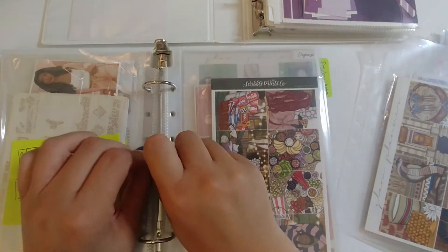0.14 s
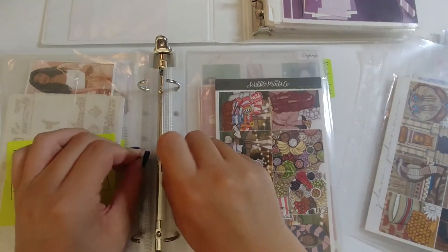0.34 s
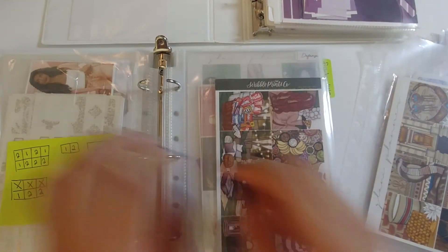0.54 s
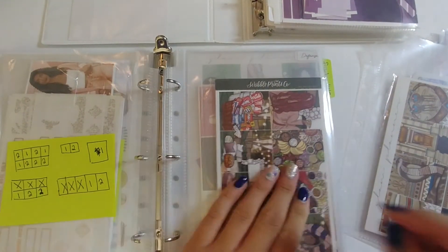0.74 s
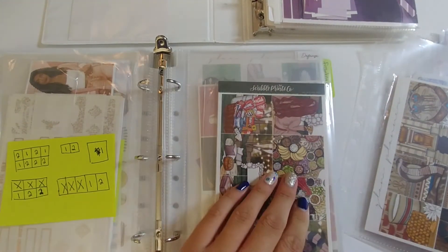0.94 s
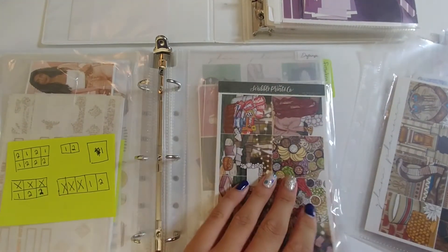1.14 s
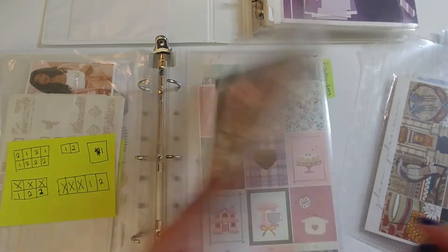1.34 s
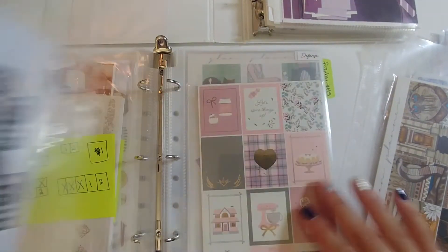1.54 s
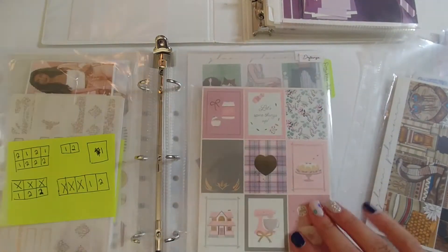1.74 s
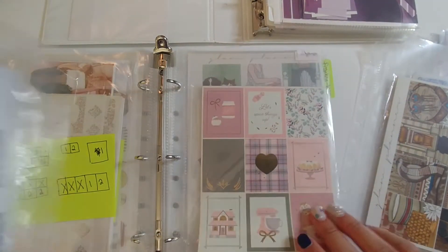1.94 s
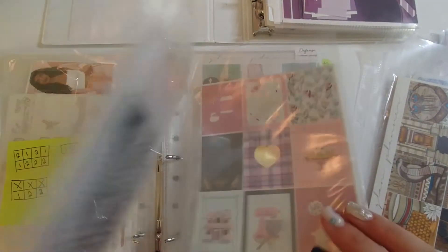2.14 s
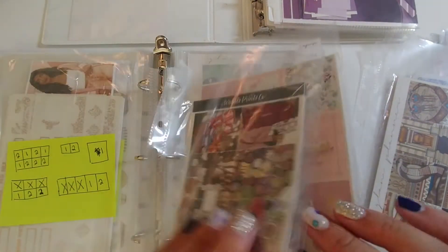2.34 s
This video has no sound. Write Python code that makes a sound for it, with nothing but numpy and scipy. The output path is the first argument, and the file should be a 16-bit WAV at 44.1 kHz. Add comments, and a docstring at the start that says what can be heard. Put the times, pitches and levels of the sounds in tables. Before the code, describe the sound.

Stiff plastic sleeves crackle and rustle under turning hands. First, a small scuff at 0 s, then a binder's steel ring snaps shut at 0.2 s with a tiny high ring, double clack, clatter and low thump. Near quiet follows. Crisp pops and swishes burst from 1.2 to 1.5 s, then again from about 1.95 to 2.45 s, with soft thumps. Close, small room, low hum.

```python
"""A small room with a low hum: a ring binder snaps shut on a table, then hands turn stiff plastic sleeves.
The steel ring sings on two sine tones, clacks in decaying noise and clatters in random ticks.
Board modes thump as damped sines; knocks and scuffs are decaying noise bands.
Creases pop as volleys of noise with ringing bands; the sleeves rustle in random clicks over hiss.
Hum lines waver over shaped noise, and sparse echoes make the room."""
import sys
import numpy as np
from scipy import signal
from scipy.io import wavfile
from scipy.ndimage import uniform_filter1d

SR = 44100
rng = np.random.default_rng(int(sys.argv[2]) if len(sys.argv) > 2 else 0)


def to_wav(sig):
    """Store sig (one row per channel, or 1-D mono) as 16-bit WAV at the path in sys.argv[1].

    Samples outside -1..1 are clipped; the rate is SR.
    """
    pcm = np.clip(np.atleast_2d(sig), -1, 1) * 32767
    pcm = np.round(pcm).astype(np.int16)
    wavfile.write(sys.argv[1], SR, pcm.T)  # frames by channels


def gain_from_decibels(decibels):
    """Convert decibel values to linear amplitude factors."""
    exponent = np.asarray(decibels, float) / 20
    return 10 ** exponent


N = 110250  # samples, 2.5 s


def evened(x):
    """Power normalisation: scale to rms 1."""
    return x / np.sqrt(np.mean(x ** 2) + 1e-20)


def peaked(x):
    """Peak normalisation: scale to peak 1."""
    return x / (abs(x).max() + 1e-12)


def read(points, hz):
    """Logarithmic frequency scale: interpolate a spectrum along it."""
    f, value = np.transpose(points)
    return np.interp(np.log(hz + 1), np.log(f + 1), value)


def band(x, lo_hz, hi_hz):
    """Band-pass filtering, with the upper edge kept below half the sample rate."""
    sos = signal.butter(2, [lo_hz, min(hi_hz, 0.48 * SR)], "band", fs=SR, output="sos")
    return signal.sosfilt(sos, x)


def left_right(db):
    """Level difference between channels: raise the left by db and lower the right by db."""
    return gain_from_decibels(np.array([[db], [-db]]))


def add(mix, s, sound, pan_db, lag=0):
    """Interaural-style cues: the left is pan_db louder than the right and lag samples later."""
    start = round(s * SR)
    for side, at, db in zip(mix, (start + lag, start), (pan_db / 2, -pan_db / 2)):
        part = side[max(at, 0):][:len(sound)]
        part += sound[:len(part)] * gain_from_decibels(db)


def tone(hz, db, width_hz):
    """Frequency modulation: a sine of rms level db wavers slowly in pitch."""
    drift = evened(uniform_filter1d(rng.standard_normal(N), 8000))
    cycles = np.cumsum(hz + 0.32 * width_hz * drift) / SR + rng.random()
    return np.sqrt(2) * gain_from_decibels(db) * np.sin(2 * np.pi * cycles)


# steady hum lines: (frequency [Hz], rms level [dB], width of waver [Hz])
HUM_LINES = [(58.2, -46, 4.2), (71.5, -65, 6.3), (121, -58.5, 1.5), (294.5, -60, 3)]
# one line that sets in and stays: (frequency [Hz], rms level [dB], width of waver [Hz])
LATE_LINE = (220, -55, 3)
# spectrum shape of rumble and hiss: (frequency [Hz], relative level per Hz [dB])
FLOOR_SHAPE = [(20, -28), (60, -6), (200, -11.5), (297, -15.5), (372, -25.5), (15200, -57.5)]
# left-right likeness of that noise: (frequency [Hz], correlation [0 to 1])
LIKENESS = [(60, 1), (300, 0.97), (2000, 0.092)]


def background():
    """Partial coherence: room rumble is alike in both channels, hiss is not; hum lines lie on top."""
    late_s, rise_s, floor_db = 1.26, 0.095, -54
    hz = np.fft.rfftfreq(2048, 1 / SR)
    a, b, c, d = rng.standard_normal((N // 512 + 5, 1025, 4)).T
    left, other = a + 1j * b, c + 1j * d
    same = np.clip(read(LIKENESS, hz), -1, 1)[:, None]
    right = same * left + np.sqrt(1 - same ** 2) * other
    spectra = np.array([left, right]) * gain_from_decibels(read(FLOOR_SHAPE, hz))[:, None]
    noise = signal.istft(spectra, nperseg=2048, noverlap=1536)[1][:, :N]
    floor = gain_from_decibels(floor_db) * evened(noise)
    late = tone(*LATE_LINE) * np.clip((np.arange(N) / SR - late_s) / rise_s, 0, 1)
    hum = sum(tone(*row) for row in HUM_LINES)
    return (floor + late + hum) * left_right(2.2)


# sliding sleeves, level before colouring: (time [s], level [dB])
RUSTLE_LEVEL = [(0, -51.5), (0.077, -82.5), (.72, -86), (0.8, -79), (0.868, -68.5), (0.948, -73),
                (1.019, -78), (1.08, -57.5), (1.14, -110), (1.19, -63), (1.217, -39), (1.261, -47),
                (1.288, -58), (1.356, -58.5), (1.366, -37.5), (1.429, -49), (1.511, -48.5), (1.545, -73.5),
                (1.58, -68.5), (1.62, -84), (1.735, -79), (1.76, -63), (1.8, -81), (1.829, -66.5),
                (1.92, -67.5), (1.964, -48), (2.078, -43.5), (2.148, -61), (2.19, -49.5), (2.248, -42.5),
                (2.34, -48), (2.429, -55)]
# bright, middling and dull grains:
# (from [Hz], to [Hz], level share at -50 dB [dB], extra per dB of level above that [dB])
RUSTLE_BANDS = [(4600, 18600, 0, 0), (1900, 4620, -3, 0.1931), (237, 1750, -3.5, 0.2564)]


def rustle():
    """Random-impulse noise: clumped tiny clicks over sliding hiss; louder means fuller."""
    grains_per_s, spread_db, hiss_share = 1200, 4, 0.45
    clump = np.exp(0.65 * evened(uniform_filter1d(rng.standard_normal((3, N)), 500)))
    size = gain_from_decibels(spread_db * np.minimum(rng.exponential(1, (3, N)), 3)) * rng.standard_normal((3, N))
    grains = evened(size * (rng.random((3, N)) < clump * grains_per_s / SR))
    hiss = np.sqrt(clump[:, None]) * rng.standard_normal((3, 2, N))  # differs left and right
    kinds = hiss_share * hiss + (1 - hiss_share) * grains[:, None]
    level = np.interp(np.arange(N) / SR, *np.transpose(RUSTLE_LEVEL))
    mix = np.zeros((2, N))
    for x, (lo, hi, db, fuller) in zip(kinds, RUSTLE_BANDS):
        mix += gain_from_decibels(db + fuller * (level + 50)) * evened(band(x, lo, hi))
    return gain_from_decibels(level) * left_right(3.5) * mix


# dull knocks and scuffs of hands, board and fingernails:
# (time [s], starting level [dB], centre [Hz], 60 dB decay time [s])
SCUFF_EVENTS = [(0, -28.5, 1890, 0.046), (.228, -30, 254, 0.38), (0.377, -48.5, 1500, 0.28),
                (0.43, -52, 521, 0.43), (0.7765, -41, 4600, 0.023), (1.44, -37, 252, 0.47),
                (2.069, -38, 129, 0.95)]


def scuffs():
    """Exponential decay: band noise starts at once and dies away, ending after 0.27 s at most."""
    out, t = np.zeros((2, N)), np.arange(12000) / SR
    noises = rng.standard_normal((len(SCUFF_EVENTS), len(t)))
    for (s, db, hz, t60), noise in zip(SCUFF_EVENTS, noises):
        add(out, s, gain_from_decibels(db - 60 * t / t60) * evened(band(noise, hz / 1.5, hz * 1.38)), 5)
    return out


# plastic creases popping, before colouring: (time [s], treble peak [dB], body relative to treble [dB])
CREASES = [(0.1092, -70.5, 26.5), (1.0445, -41, -20), (1.0626, -21, -18), (1.0768, -23, -12),
           (1.215, -11, -1.5), (1.2225, -11.5, -10), (1.2367, -23, -37), (1.2436, -11, -17),
           (1.254, -24, -25.5), (1.3005, -30.5, 5), (1.313, -18.5, -35), (1.3194, -5.5, -15),
           (1.3355, -41, 13.5), (1.3626, -5, -13.5), (1.4441, -20.5, -6), (1.4695, -16, -8.5),
           (1.4975, -19.5, -8.5), (1.5125, -25, -10), (1.8489, -27, -25), (1.9742, -10.5, -8),
           (2.0448, -13, 3.5), (2.083, -18.5, -2.5), (2.104, -14.5, -9.5), (2.1672, -27.5, 4),
           (2.2262, -6.5, -6), (2.237, -15, -17), (2.2455, -13, -18), (2.262, -20, -1), (2.268, -20, -15),
           (2.2855, -17, -5.5), (2.323, -30, -16), (2.387, -34.5, 9), (2.4558, -24, -1.5)]
# treble, then body of a pop: (from [Hz], to [Hz], 60 dB decay time [s])
CREASE_BANDS = [(3264, 33000, 0.0017), (749, 3810, 0.0096)]


def pops():
    """Snap-through buckling: a volley of clicks builds to a snap and dies; treble and body ring out."""
    volley_s, ring_share = 0.00056, 0.59
    out, t = np.zeros((2, N)), np.arange(-200, 1300) / SR  # the snap is at t = 0
    draws = rng.standard_normal((len(CREASES), 2, len(t)))
    lags = rng.integers(-8, 6, len(CREASES))
    for (s, db, body_db), (a, b), lag in zip(CREASES, draws, lags):
        clicks = a * np.exp(0.75 * b)
        volley = (clicks + 5 * (t == 0)) * np.exp(-abs(t) / volley_s)
        parts = []
        for lo, hi, t60 in CREASE_BANDS:
            ringing = ring_share * b * (t > 0) * gain_from_decibels(-60 * t / t60)
            parts.append(peaked(band(volley + ringing, lo, hi)))
        treble, body = parts
        sound = gain_from_decibels(db) * (treble + gain_from_decibels(body_db) * body)
        add(out, s + t[0], sound, 4.5 + 2.34 * s, lag)  # later pops lie further left
    return out


# modes of table and binder board: (time [s], level [dB], frequency [Hz], 60 dB decay time [s])
BOARD_MODES = [(.2022, -9.5, 524, 0.01), (0.236, -18.5, 121, 0.2), (0.229, -25.5, 81.5, 0.2),
               (1.211, -32.5, 226, 0.044), (1.496, -20.5, 123.7, 0.08), (2.045, -13, 268, 0.019),
               (2.176, -18.5, 357, 0.017), (2.357, -18, 610, 0.011)]


def thumps():
    """Damped modal vibration: low board modes with a soft start."""
    rise_s = 0.0014
    out, t = np.zeros((2, N)), np.arange(15000) / SR
    for s, db, hz, t60 in BOARD_MODES:
        envelope = (1 - np.exp(-t / rise_s)) * gain_from_decibels(db - 60 * t / t60)
        add(out, s, envelope * np.sin(2 * np.pi * hz * t), 4)
    return out


# tones of the sprung ring, before colouring: (frequency [Hz], peak level [dB])
RING_TONES = [(7015, -26), (13990, -30.5)]
# clacks of the steel, before colouring: (time [s], peak level [dB])
RING_CLACKS = [(0.2027, -9), (0.2265, -11.5)]


def ring():
    """Free vibration ended by impact: the released ring sings until steel meets steel and clatters."""
    release_s, meet_s, sing_fade_db = 0.2025, 0.2262, -0.5
    crack_t60_s = 0.043
    rattle_db, rattle_t60_s, rattles_per_s = -17.5, 0.24, 5500
    rattle_hz, rattle_peak_db = 2720, -8.5  # resonance within the clatter
    out, t = np.zeros((2, N)), np.arange(12000) / SR

    u = np.arange(0, meet_s - release_s, 1 / SR)
    edges = np.minimum(1, np.minimum(u / 0.0033, (u[-1] - u) / 0.002))
    fade = edges * gain_from_decibels(sing_fade_db * u / u[-1])
    tones = sum(gain_from_decibels(db) * np.sin(2 * np.pi * hz * u) for hz, db in RING_TONES)
    add(out, release_s, fade * tones, 6.5)

    cracks = rng.standard_normal((len(RING_CLACKS), len(t)))
    for (s, db), crack in zip(RING_CLACKS, cracks):
        clack = peaked(band(crack * gain_from_decibels(-60 * t / crack_t60_s), 330, 18000))
        add(out, s, gain_from_decibels(db) * clack, 6, lag=-7)

    hits = rng.random(len(t)) < rattles_per_s / SR
    ticks = rng.standard_normal((2, len(t))) * (0.2 + hits * 3)
    resonance = evened(band(ticks, 0.81 * rattle_hz, 1.256 * rattle_hz))
    clatter = evened(band(ticks, 320, 15000)) + gain_from_decibels(rattle_peak_db) * resonance
    decay = gain_from_decibels(rattle_db - 60 * t / rattle_t60_s) * left_right(2.5)
    out[:, round(meet_s * SR):][:, :len(t)] += clatter * decay
    return out


# response of sleeves and microphone ports: (frequency [Hz], relative gain [dB])
PORT_RESPONSE = [(150, -19.5), (350, -4), (1900, -6), (7600, 4.5), (9200, -5.5), (10600, -21), (15000, -6),
                 (16500, -4)]


def colour(x):
    """Minimum-phase filtering: causal colour of sleeves and microphone ports, raised by 8.5 dB."""
    log_gain = np.log(gain_from_decibels(read(PORT_RESPONSE, abs(np.fft.fftfreq(4096, 1 / SR)))))
    phase = -signal.hilbert(log_gain).imag
    taps = np.fft.ifft(np.exp(log_gain + 1j * phase)).real[:2048]
    return signal.fftconvolve(x, taps[None] * gain_from_decibels(8.5), axes=1)[:, :N]


# reverberation: (frequency [Hz], 60 dB decay time [s])
ROOM_DECAY = [(4000, 0.31), (12000, 0.23)]


def room(x):
    """Reverberation: early taps off the table, then sparse taps dying band by band."""
    tail_db, early_db, left_db = -11, -12.5, 3  # tail and early taps before the left-right tilt
    taps = np.zeros((2, SR // 2))
    jitter = rng.integers(0, 20, (2, (SR // 2 - 301) // 20))
    at = np.arange(300, SR // 2 - 20, 20) + jitter
    np.put_along_axis(taps, at, rng.choice([-1., 1.], at.shape), 1)
    hz, t, z = signal.stft(taps, SR, nperseg=256)
    decay = gain_from_decibels(-60 * t / read(ROOM_DECAY, hz)[:, None])
    tail = signal.istft(z * decay, SR, nperseg=256)[1]
    tail *= gain_from_decibels(tail_db) / np.linalg.norm(tail[0])
    early = gain_from_decibels(early_db) * rng.uniform(-0.88, 1, (2, 5))
    np.put_along_axis(tail, rng.integers(30, 300, (2, 5)), early, 1)
    return signal.fftconvolve(x.mean(0)[None], tail * left_right(left_db), axes=1)[:, :N]


def scene():
    """Superposition: coloured sleeves and ring, uncoloured thumps and scuffs, their echoes, background."""
    near = colour(pops() + rustle() + ring())
    low = thumps() + scuffs()
    echoes = room(band(near + low, 280, 17000))
    return near + low + echoes + background()


def top_cut(x):
    """Nothing passes above the cut-off."""
    return signal.sosfilt(signal.butter(12, 16950, fs=SR, output="sos"), x)


def record(dry):
    """Clipping and band limitation: full scale bounds the peaks, a low-pass at 16 kHz the treble."""
    low_pass = signal.firwin(511, 16000, window=("kaiser", 8), fs=SR)
    mix = signal.oaconvolve(np.clip(dry, -1, 1), low_pass[None], "same")
    return top_cut(mix)


dry = scene()
out = record(dry)
to_wav(out)
```